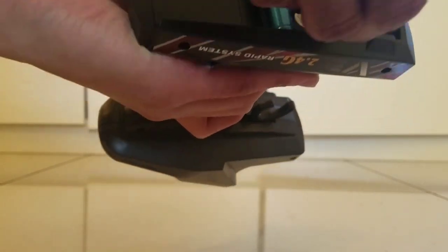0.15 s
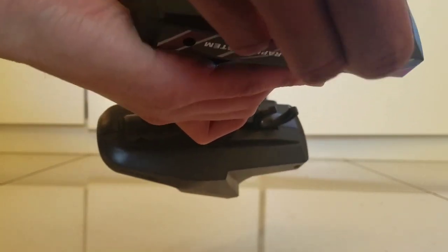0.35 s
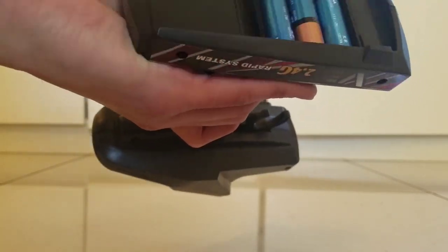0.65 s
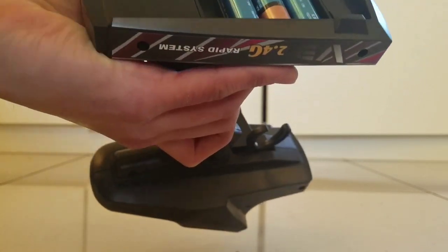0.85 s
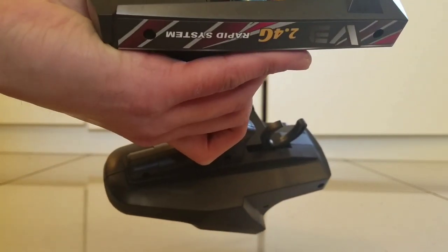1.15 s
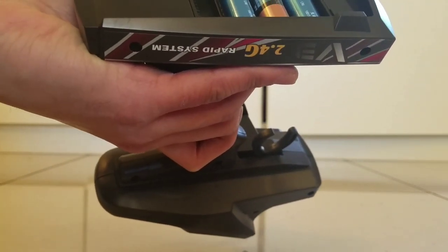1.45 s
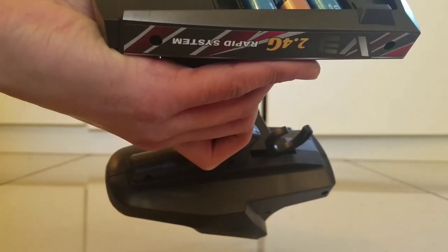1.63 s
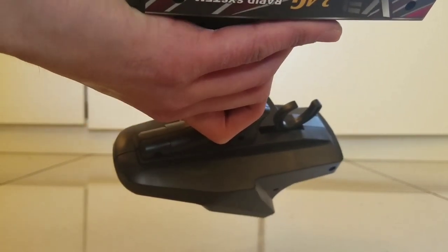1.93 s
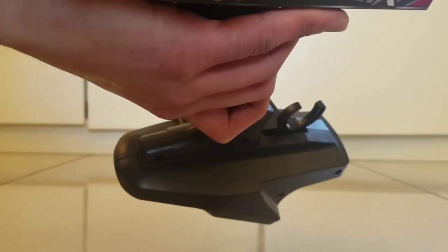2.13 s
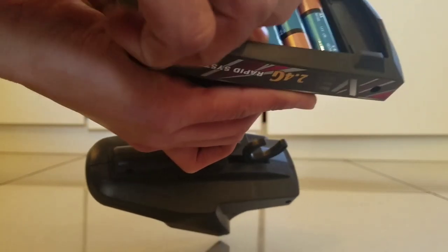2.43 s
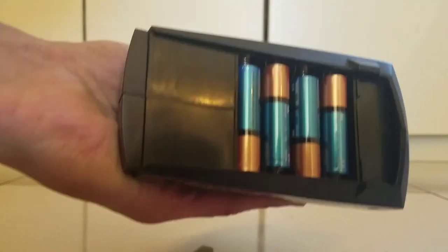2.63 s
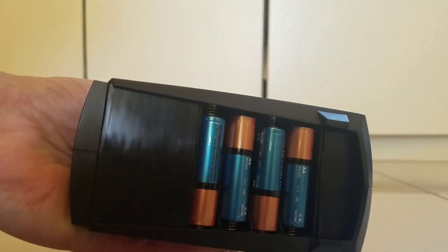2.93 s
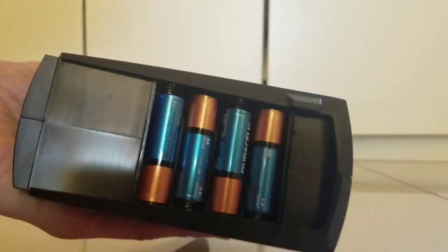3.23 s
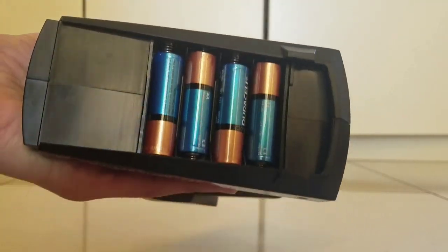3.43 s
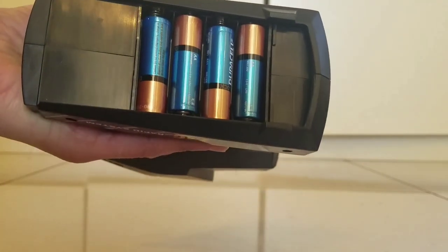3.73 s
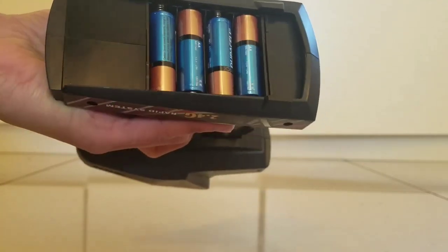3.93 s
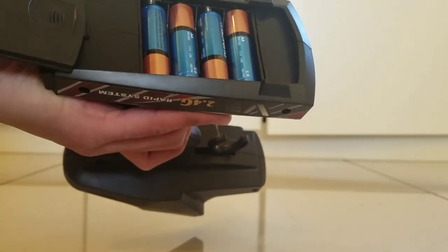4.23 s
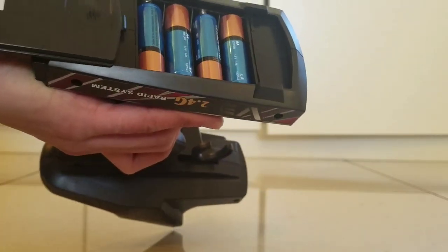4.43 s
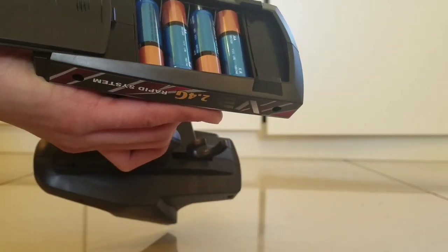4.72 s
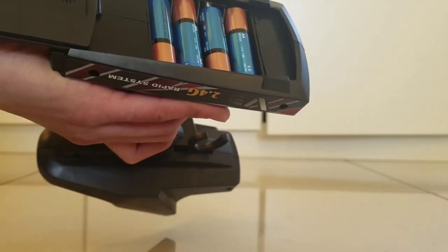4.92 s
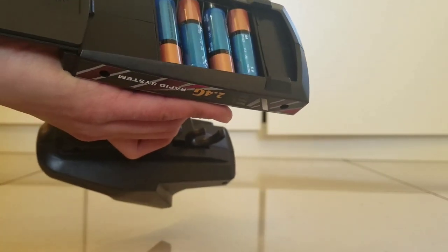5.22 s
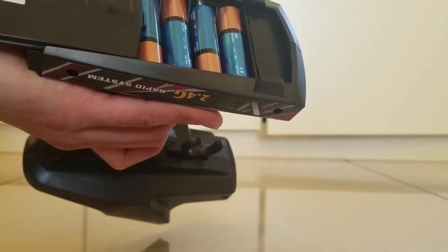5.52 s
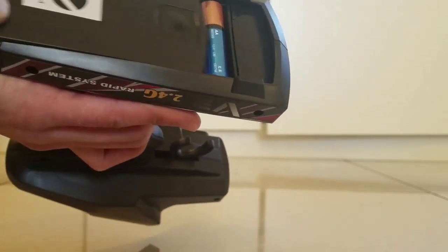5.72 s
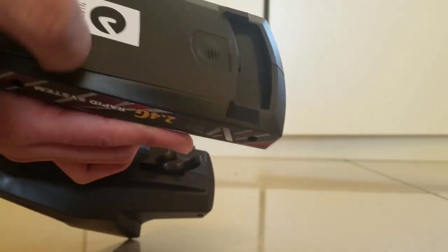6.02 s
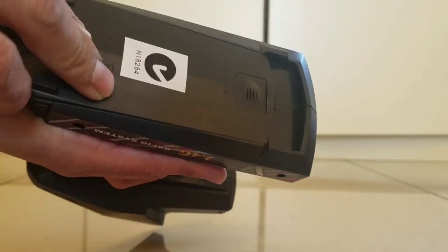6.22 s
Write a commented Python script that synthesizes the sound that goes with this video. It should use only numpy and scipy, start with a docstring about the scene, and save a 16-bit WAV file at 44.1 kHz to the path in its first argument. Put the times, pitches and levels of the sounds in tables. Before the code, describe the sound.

Batteries snap sharply into a hollow plastic controller case, then quiet plastic handling, scrapes and light cover clicks in a small tiled room.

```python
"""Batteries pressed into the plastic case of a hand-held remote controller, close by in a small tiled room.
Some scrape in before they snap home: clusters of chattering contacts ring the case's resonances.
Slides and rustles are swells of tiny slips, low thumps filtered noise; the cover is laid on, slid and clicked shut.
A low hum and shaped room noise lie underneath; the recorder's gain control ducks everything after loud snaps."""
import sys
import numpy as np
from scipy import signal
from scipy.fft import rfft, irfft
from scipy.io import wavfile
from scipy.ndimage import uniform_filter1d

SR = 44100
rng = np.random.default_rng(int(sys.argv[2]) if len(sys.argv) > 2 else 0)


def inscribe(sig):
    """Save sig as 16-bit PCM at rate SR to the path in sys.argv[1].

    A 1-D sig is mono; a 2-D sig holds one channel per row.
    Samples are clipped to [-1, 1] before scaling.
    """
    pcm = np.round(np.clip(np.atleast_2d(sig).T, -1, 1) * 32767)
    wavfile.write(sys.argv[1], SR, pcm.astype(np.int16))


N = 280781  # samples
TAPS = 4096  # response length, samples
HZ = np.fft.rfftfreq(TAPS, 1 / SR)
SIDES = np.array([[.5], [-.5]])  # shares of a left-right dB difference


def gain_of(db):
    """Decibels to amplitude."""
    return 10 ** (np.asarray(db) / 20)


def evened(x):
    """Scales to rms 1 over all channels."""
    return x / np.sqrt(np.mean(x ** 2) + 1e-20)


def read(points, hz):
    """Interpolates a table on a log-frequency axis."""
    point_hz, value = np.transpose(points)
    return np.interp(np.log(hz + 1), np.log(point_hz + 1), value)


def add(mix, start_s, sound):
    """Mixes a stereo sound in, cut to fit."""
    part = mix[:, max(round(start_s * SR), 0):][:, :sound.shape[1]]
    part += sound[:, :part.shape[1]]


def partly_alike(a, b, same):
    """Left and right signals with correlation same, from independent a and b."""
    same = np.clip(same, -1, 1)
    return np.array([a, same * a + np.sqrt(1 - same ** 2) * b])


def port_noise(count, same):
    """White noise at two microphones, partly alike."""
    a, b = rng.standard_normal((2, count))
    return partly_alike(a, b, same)


def wander(turns_per_s):
    """Slow random curve: unit normal points joined by lines."""
    return np.interp(np.arange(N) / SR * turns_per_s, np.arange(TAPS), rng.standard_normal(TAPS))


def trailing_mean(x, length_s):
    """Mean over the last length_s seconds."""
    count = max(int(length_s * SR), 1)
    return signal.fftconvolve(x, np.ones(count) / count)[:N]


def peak(centre_hz, width_hz):
    """Power bell of one resonance, height 1."""
    return 1 / (1 + (2 * (HZ - centre_hz) / width_hz) ** 2)


def response(broad, modes):
    """Gain in dB of a plastic part: resonances on its broad response."""
    return read(broad, HZ) + sum(db * peak(hz, width_hz) for hz, width_hz, db in modes)


def ringing(gain_db, lean_db):
    """Causal (minimum-phase) left and right impulse responses with the given gains."""
    log_gain = np.log(gain_of(gain_db + SIDES * lean_db))
    circle = np.concatenate([log_gain, log_gain[:, -2:0:-1]], 1)
    return np.fft.ifft(np.exp(np.conj(signal.hilbert(circle)))).real


# Centres of thud, knock, clack and tick bands: [Hz]
BAND_HZ = [450, 1150, 2400, 5000]


def band_colour(thud_db, knock_db, clack_db, tick_db):
    """Colour in dB from the four band levels."""
    return read(list(zip(BAND_HZ, (thud_db, knock_db, clack_db, tick_db))), HZ)


def fine_modes(size_db, spacing_hz, half_hz):
    """Dense upper modes: random dB per side, reaching half size at half_hz."""
    heights = rng.uniform(-1.2, 1, (2, TAPS))
    ripple = np.array([np.interp(HZ / spacing_hz, np.arange(TAPS), side) for side in heights])
    return size_db * HZ / (HZ + half_hz) * ripple


def contact(chatter_s, chatter_db, same, grip, smooth_bins=45):
    """Force of a sharp blow plus chatter of tiny slips that builds and dies; broad bands equalised."""
    t = np.arange(TAPS // 2) / SR / max(chatter_s, 1e-4)
    envelope = np.exp(-t) * (1 - np.exp(-t / max(grip, .01)))
    slips = port_noise(len(t), same) * envelope
    force = gain_of(chatter_db) * slips / np.linalg.norm(slips, axis=1, keepdims=True)
    force[:, 0] += min(0.0019 / max(chatter_s, 1e-4), 2)  # longer chatter, weaker blow
    spectrum = rfft(force, TAPS)
    broad_power = uniform_filter1d(abs(spectrum) ** 2, smooth_bins, axis=1)
    return irfft(spectrum / np.sqrt(broad_power))[:, :len(t)]


def rattle(rattle_s, *touch):
    """Force of a snap: a contact and three ever quicker rebounds, fading by e per rattle_s."""
    first_gap_s, gap_shrink = .005, .85
    force, start_s = np.zeros((2, 2 * TAPS)), 0
    for k in range(4):
        add(force, start_s, np.exp(-start_s / max(rattle_s, 1e-4)) * contact(*touch))
        start_s += first_gap_s * gap_shrink ** k
    return force


# Colour of the settling grit against the part's response: [Hz, dB]
GRIT_COLOUR = [(600, -3.5), (2400, 1), (4200, 3), (11000, 0.5)]


def clicks(rows, body_db, lean, ring_db, ring_width_hz, chatter_s, chatter_db, same, grip,
           settle_db, settle_s, lag_samples=3):
    """Each snap rings the part, one resonance favoured; faint decaying grit is laid beneath it."""
    knock_share = 0.78  # of the extra thud
    out = np.zeros((2, N))
    t = np.arange(2 * TAPS) / SR
    for start_s, level_db, rattle_s, ring_hz, thud_db, tick_db, pan_db in rows:
        colour_db = band_colour(thud_db, knock_share * thud_db, 0, tick_db)
        colour_db = colour_db + ring_db * peak(ring_hz, ring_width_hz)
        fine_db = fine_modes(size_db=7, spacing_hz=160, half_hz=1000)
        ring = ringing(body_db + colour_db + fine_db, read(lean, HZ) + pan_db)
        snap = signal.fftconvolve(rattle(rattle_s, chatter_s, chatter_db, same, grip), ring, axes=1)

        grit = port_noise(len(t), same=.25) * np.exp(-t / max(settle_s, 1e-3))
        grit_ring = ringing(body_db + fine_db + read(GRIT_COLOUR, HZ), 0)
        grit = signal.fftconvolve(grit, grit_ring, axes=1)

        sound = evened(snap) + gain_of(settle_db) * evened(grit)
        sound[1] = np.roll(sound[1], lag_samples)  # right microphone lags
        spread = np.sqrt(.01 * SR / sound.shape[1])  # level_db: energy as rms over 10 ms
        add(out, start_s, gain_of(level_db) * spread * evened(sound))
    return out


# Room noise spectrum before scaling: [Hz, dB per Hz]
BACKGROUND = [(12, -29.5), (25, -13), (45, -6), (66, -6), (85, -5), (106, -4), (150, -9.5), (200, -6),
              (300, -14), (500, -18), (700, -20.5), (1030, -17), (1600, -25.5), (2700, -32.5), (4000, -33),
              (4600, -40.5), (6500, -44), (8200, -55), (10500, -45.5), (14000, -42.5)]
# Left-right likeness of the room noise: [Hz, correlation]
BACKGROUND_SAME = [(100, 0.96), (300, 0.92), (1000, 0.23), (3000, 0.081), (12000, 0.24)]


def background(level_db):
    """Steady room rumble and faint hiss: shaped noise, nearly mono in the bass."""
    hz = np.fft.rfftfreq(N, 1 / SR)
    a, b = rfft(rng.standard_normal((2, N)))
    spectrum = partly_alike(a, b, read(BACKGROUND_SAME, hz)) * gain_of(read(BACKGROUND, hz))
    return gain_of(level_db) * evened(irfft(spectrum, N))


# Mean rms level of the low hum: [time_s, level_db]
HUM_LEVEL = [(0, -54), (.5, -62), (1.25, -59), (2.0, -75.5), (2.4, -61.5), (3.6, -69), (4.6, -63.5),
             (6.37, -68)]


def hum(pitch_hz, drift_hz, drifts_per_s, waver, wavers_per_s):
    """One low sine that drifts in pitch and wavers in strength."""
    cycles = np.cumsum(pitch_hz + drift_hz * wander(drifts_per_s)) / SR
    tone = np.sqrt(2) * np.sin(2 * np.pi * cycles)
    level_db = np.interp(np.arange(N) / SR, *np.transpose(HUM_LEVEL))
    return tone * gain_of(level_db) * (1 + waver * wander(wavers_per_s))


# Broad response of the loaded case: [Hz, dB]
CASE = [(60, -17.5), (170, -13.5), (350, -12), (720, -10), (1300, -9), (2500, -0.5), (3500, -7.5),
        (6200, -15.5), (8200, -27.5), (10500, -21), (14000, -23.5)]
# Case resonances above it: [Hz, width_hz, dB]
CASE_MODES = [(515, 91, 10), (1040, 110, 7.5), (1480, 88, 1.5), (1906, 110, 5.5), (2264, 150, 4.5),
              (2470, 120, 3.5), (2952, 180, 5.5), (3986, 91, 8.5), (5160, 150, 2.5)]
# Case lean to the left: [Hz, left-right dB]
CASE_LEAN = [(300, -3), (700, -4), (1100, 4.5), (1600, 9), (2300, -2), (3200, -6), (5500, 5.5),
             (8000, -9.5), (12000, -3)]
# Batteries snap against spring or seat:
# [start_s, level_db, rattle_s, ring_hz, extra thud_db, extra tick_db, left-right pan_db]
BATTERY_SNAPS = [(0.2015, -31.5, .001, 1930, 8.5, -6, 3), (0.2155, -34.5, 0.0012, 2510, 4.5, -3, 2),
                 (0.3245, -24.5, 0.012, 2560, -7.5, -9.5, 3), (0.3385, -31, 0.0015, 1670, 10, 0, 4.5),
                 (0.4025, -46.5, 0.0043, 2080, -2, -16, 3), (0.417, -37.5, .007, 2290, 11, -6, 3),
                 (0.5338, -22.5, 0.0077, 2745, 2, 1, 3), (0.5545, -22.5, 0.004, 2226, -2, -1, 4),
                 (0.5662, -29, .012, 3300, -6, 5, -2.5), (2.0135, -47.5, .012, 2070, 3.5, 5, 5.5),
                 (2.0615, -50.5, 0.006, 2560, 12, 0, 0), (2.1345, -38.5, 0.0021, 2070, 8, -7, 5),
                 (2.1415, -34.5, 0.0056, 1900, 7.5, -4, 2.5), (2.17, -47, .001, 2090, 28.5, 7, -1),
                 (2.2435, -52, .003, 2070, 9, -7, 4), (2.2838, -29.5, 0.0017, 2410, 1.5, 1.5, 2),
                 (2.3412, -37.5, 0.0091, 930, 23.5, 5, 2.5), (2.4645, -46.5, .003, 1820, -1, -2, 1)]


def battery_snaps():
    """Battery contacts chatter and rebound, ringing the loaded case."""
    return clicks(BATTERY_SNAPS, response(CASE, CASE_MODES), CASE_LEAN, ring_db=7, ring_width_hz=300,
                  chatter_s=.003, chatter_db=10, same=.82, grip=1.0, settle_db=-20, settle_s=0.054)


# Broad response of the loose cover: [Hz, dB]
COVER = [(60, -32), (250, 0), (550, 2.5), (1200, -1.5), (2800, -5.5), (4200, -8.5), (6300, -18.5),
         (8200, -29), (11000, -23.5), (14000, -20)]
# Cover resonances above it: [Hz, width_hz, dB]
COVER_MODES = [(853, 270, 5.8), (1570, 110, 4.6), (2005, 120, 8), (2347, 110, 3.5), (2870, 120, 4.3),
               (3300, 90, 5.5), (3840, 120, 8), (4900, 130, 4), (11090, 200, 6.3)]


def cover_response():
    """Gain in dB of the loose cover."""
    return response(COVER, COVER_MODES)


# Slides on the case, and one long faint rustle at 1.285 s; each lasts 2 * length_s with its fades:
# [middle_s, length_s, level_db, ring_hz, tick_db before bright_db, left-right pan_db]
SLIDES = [(0.323, 0.011, -39.5, 2700, -2, 4), (0.52, 0.0094, -42.5, 2690, -3, 1),
          (1.285, 0.19, -58.5, 960, 4, -5.5), (2.076, 0.043, -53, 2657, 3.5, -1),
          (2.126, 0.021, -47, 2450, 0, 1.5), (2.483, 0.059, -55, 2200, 3, -2),
          (3.225, .09, -59, 1614, 3, 3), (3.699, 0.0078, -54, 1810, -12, 2),
          (3.733, 0.066, -58.5, 1730, 4.5, -1), (3.944, .04, -57, 2450, 12, -4),
          (4.612, 0.042, -51, 3980, 12, 0), (5.25, 0.074, -67, 2120, 12, -4),
          (5.416, 0.13, -64.5, 800, 2, -4), (5.489, .055, -58.5, 2190, 8.5, 8),
          (5.563, 0.039, -58, 3280, 3, 5), (5.662, .052, -52.5, 2100, 5.5, 7),
          (5.758, 0.027, -49, 3080, 1, 5), (5.935, 0.045, -60, 2660, 8, 9),
          (6.284, 0.082, -58.5, 870, 0.5, -2)]


def rubs(slips_per_s, grain_db, bright_db, ring_db, ring_width_hz, catch_db, catch_s):
    """A swell of tiny slips of uneven strength rings the plastic, favouring one resonance."""
    body_db = cover_response()
    out = np.zeros((2, N))
    t = np.arange(SR) / SR
    for middle_s, length_s, level_db, ring_hz, tick_db, pan_db in SLIDES:
        count = min(int(2 * length_s * SR), SR)
        slipping = rng.random(SR) < slips_per_s / SR
        size = np.minimum(rng.exponential(1, SR), 3)
        catches = np.interp(t / catch_s, np.arange(TAPS), rng.uniform(-1, 1, TAPS))
        slips = port_noise(SR, same=0.17) * slipping * gain_of(grain_db * size + catch_db * catches)
        stroke = slips[:, :count] * np.sin(np.linspace(0, np.pi, count)) ** 3
        colour_db = band_colour(-5, -4, 0, tick_db + bright_db) + ring_db * peak(ring_hz, ring_width_hz)
        sound = signal.fftconvolve(stroke, ringing(body_db + colour_db, pan_db), axes=1)
        spread = np.sqrt(length_s * SR / sound.shape[1])  # level_db: energy as rms over length_s
        add(out, middle_s - length_s, gain_of(level_db) * spread * evened(sound))
    return out


# Low thumps of the hollow case, some under a snap, level summed over both sides:
# [middle_s, length_s, pitch_hz, level_db]
THUMPS = [(1.119, 0.039, 516, -58), (2.036, 0.075, 467, -60), (2.139, 0.047, 452, -44.5),
          (2.286, .018, 352, -33.5), (2.512, 0.032, 237, -53.5), (2.906, 0.024, 500, -56.5),
          (5.418, 0.095, 242, -54), (5.947, .06, 227, -51.5)]


def thumps(width_hz, top_hz):
    """Each thump is mostly one low resonance of the hollow case: a swell of noise through one bell."""
    out = np.zeros((2, N))
    for middle_s, length_s, pitch_hz, level_db in THUMPS:
        colour = np.sqrt(peak(pitch_hz, width_hz)) * np.minimum(HZ / pitch_hz, 1) ** 2
        colour = colour / (1 + (HZ / top_hz) ** 4)
        thud = irfft(rfft(port_noise(TAPS, same=0.81)) * colour)[:, :int(length_s * SR)]
        swell = np.sin(np.linspace(0, np.pi, thud.shape[1]))
        add(out, middle_s - length_s / 2, gain_of(level_db) * evened(thud * swell) / np.sqrt(2))
    return out


def fingers(from_s, level_db, slips_per_s, grain_db, swell_db, shifts_per_s):
    """The grip keeps shifting while the case is turned: faint random slips in swells."""
    slipping = (rng.random(N) < slips_per_s / SR) & (np.arange(N) > from_s * SR)
    size = np.minimum(rng.exponential(1, N), 4)
    swell = np.clip(wander(shifts_per_s), -1, 1) * swell_db
    slips = port_noise(N, same=0.17) * slipping * gain_of(grain_db * size + swell)
    rubbing = signal.oaconvolve(slips, ringing(cover_response(), 0), axes=1)[:, :N]
    return gain_of(level_db) * evened(rubbing)


# Cover lean to the left: [Hz, left-right dB]
COVER_LEAN = [(300, -11), (800, -8.5), (1300, 0.5), (2300, 2.5), (3300, -4), (5200, 11), (9000, 11),
              (13000, -1)]
# Shell clicks as the case is turned and the cover shut:
# [start_s, level_db, rattle_s, ring_hz, extra thud_db, extra tick_db, left-right pan_db]
SHELL_SNAPS = [(3.174, -35.5, 0.00072, 1160, -3.5, -8, 7), (3.6935, -47.5, 0.0089, 1830, -7, -4, 12),
               (3.92, -39, 0.0095, 2410, -10, 3, 7.5), (4.228, -35.5, 0.0016, 2910, -3, -4.5, 8.5),
               (4.2445, -48, .002, 2440, -7, 2.5, -5), (4.589, -45, 0.0092, 3120, -7, 6, 5),
               (4.6494, -52, 0.0036, 844, -5, 0, 8), (4.6865, -42, 0.0011, 3170, -4.5, -1.5, 6),
               (5.2145, -55, .001, 990, -1.5, -9.5, 2), (5.7385, -50.5, 0.0075, 2270, 3, -5, 13),
               (5.7738, -39.5, 0.011, 1280, 3.5, -1, 9), (5.7835, -36.5, 0.0014, 2030, -7.5, -2, 0),
               (5.7922, -39.5, .002, 660, -4, -5.5, 12.5), (5.8425, -52, 0.0026, 1160, 3, 4, 0),
               (5.9145, -52.5, 0.0023, 1976, 18, 14, 7.5), (6.0385, -48, 0.015, 1060, 4.5, 1, 7),
               (6.2875, -50, .003, 1030, 8, -5, 7)]


def shell_snaps():
    """Shell contacts chatter and rebound, ringing the loose cover."""
    return clicks(SHELL_SNAPS, cover_response(), COVER_LEAN, ring_db=13.5, ring_width_hz=450,
                  chatter_s=0.0026, chatter_db=4, same=0.27, grip=0.32, settle_db=-14.5, settle_s=0.036)


# Modes of a battery spring that twangs once as the case is turned: [Hz, starting peak dB, t60_s]
SPRING = [(2462, -47, 0.034), (5700, -56, 0.042), (10900, -46.5, 0.03), (11100, -53, 0.051)]


def spring(start_s, lean_db):
    """Thin steel wire rings on after a slip: decaying sines."""
    t = np.arange(TAPS) / SR
    ring = sum(gain_of(db - 60 * t / t60_s) * np.sin(2 * np.pi * hz * t) for hz, db, t60_s in SPRING)
    out = np.zeros((2, N))
    add(out, start_s, ring * gain_of(SIDES * lean_db))
    return out


# Reverberation time: [Hz, t60_s]
ROOM_T60 = [(200, .3), (700, 0.16), (2500, 0.17), (5000, 0.07), (13000, 0.083)]
# How much of each band the room throws back: [Hz, dB]
ROOM_DB = [(200, -19), (1000, -17.5), (2500, -18), (4500, -10), (12000, -10.5)]


def room(x, echo_s, echo_db, onset_s, mono_hz):
    """One early echo off the tiles and a short tail of sparse reflections, alike on both sides in the bass."""
    count = SR // 2
    taps = rng.choice([-1., 1.], (2, count)) * (rng.random((2, count)) < 1 / 5)
    taps *= np.clip(np.arange(count) / SR / onset_s - .5, 0, 1)
    hz, t, z = signal.stft(taps, SR, nperseg=256)
    z = partly_alike(z[0], z[1], np.exp(-hz / mono_hz)[:, None])
    z *= gain_of(-60 * t / read(ROOM_T60, hz)[:, None])
    norm = np.linalg.norm(signal.istft(z[0], SR, nperseg=256)[1])
    tail = signal.istft(z * gain_of(read(ROOM_DB, hz))[:, None], SR, nperseg=256)[1] / norm
    tail[:, int(echo_s * SR)] += gain_of(echo_db)
    return signal.fftconvolve(x, tail, axes=1)[:, :N]


def gain_control(x, depth_db, attack_s, hold_s, recover_s):
    """Sound over the threshold turns the gain down; it stays down a moment, then comes back."""
    window_s, threshold_db = .06, -29
    t = np.arange(N) / SR
    power = abs(trailing_mean((x ** 2).mean(0), window_s))
    level_db = 10 * np.log10(power + 1e-12)
    over = np.clip(level_db - threshold_db, 0, 1)
    wait_s = np.maximum.accumulate(over * (hold_s + recover_s) + t) - t  # time left until full gain
    duck = trailing_mean(np.minimum(wait_s / recover_s, 1), attack_s)
    return x * gain_of(-depth_db * duck)


def scene():
    """Batteries, hands and cover in the room, over rumble and hum."""
    handling = battery_snaps() + shell_snaps() + thumps(width_hz=152, top_hz=1270)
    handling += rubs(slips_per_s=7000, grain_db=2, bright_db=-3.5, ring_db=9.0, ring_width_hz=350,
                     catch_db=5.0, catch_s=.0049)
    handling += fingers(from_s=2.2, level_db=-74.5, slips_per_s=970, grain_db=2.5, swell_db=7.5,
                        shifts_per_s=12)
    handling += spring(start_s=3.92, lean_db=5)
    reflections = room(handling, echo_s=.0168, echo_db=-26, onset_s=0.003, mono_hz=1200)
    low_tone = hum(pitch_hz=67.3, drift_hz=11, drifts_per_s=11, waver=.25, wavers_per_s=9.7)
    return handling + reflections + background(level_db=-58.5) + low_tone


def record(dry):
    """The recorder's gain control, then its low-pass band limit."""
    edge_hz = 14800
    ducked = gain_control(dry, depth_db=15.5, attack_s=0.12, hold_s=0.18, recover_s=0.22)
    low_pass = signal.firwin(255, edge_hz, window=("kaiser", 8), fs=SR)
    return signal.oaconvolve(ducked, low_pass[None], "same", axes=1)


dry = scene()
out = record(dry)
inscribe(out)
```